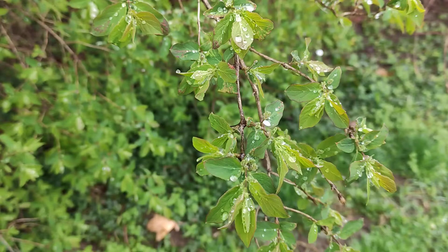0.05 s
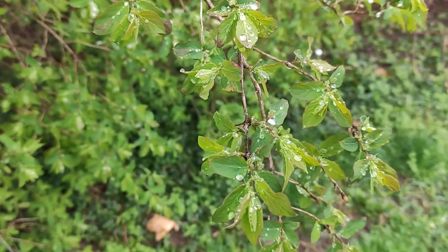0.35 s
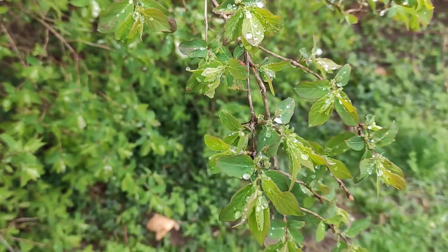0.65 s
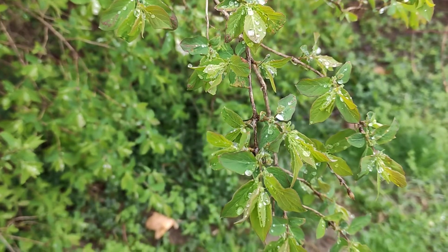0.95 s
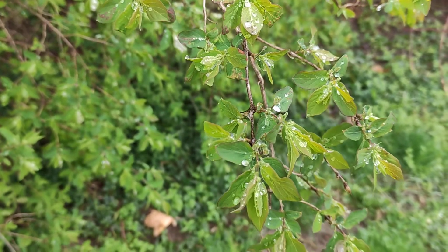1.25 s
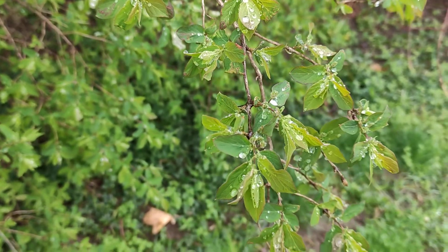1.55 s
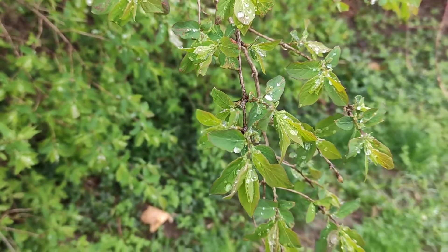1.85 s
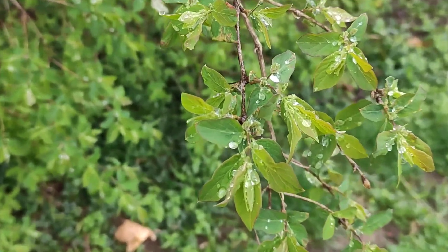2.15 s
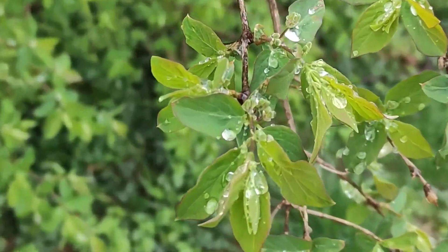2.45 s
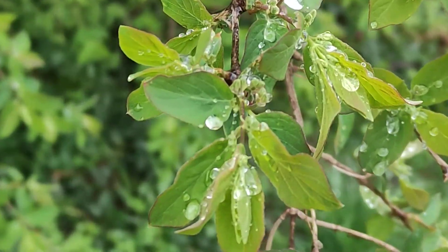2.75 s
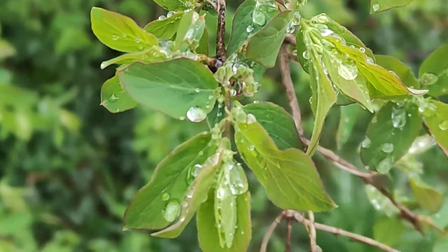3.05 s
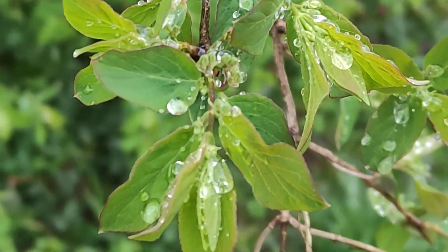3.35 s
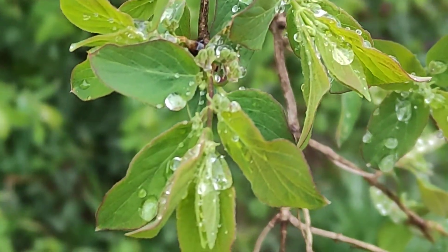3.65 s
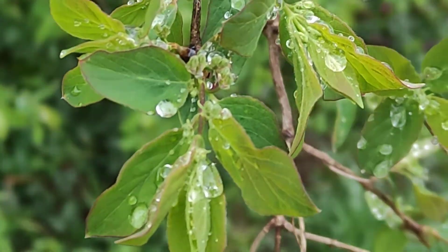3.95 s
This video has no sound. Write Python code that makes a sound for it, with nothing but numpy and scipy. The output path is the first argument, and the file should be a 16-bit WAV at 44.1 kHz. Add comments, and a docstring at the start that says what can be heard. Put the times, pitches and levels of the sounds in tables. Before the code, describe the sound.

Birds sing outdoors: first a seesawing two-note whistle, then thin high calls and soft alternating pips, before the whistle returns. Behind them are steady far traffic, a distant engine changing gear and faint ticks of water on leaves.

```python
"""Tits repeat a two-note whistle in a wet garden after rain. Another bird answers with soft pips,
a smaller one sings two thin notes and three falling slurs, a far one whistles faintly. Each note is
a tone on a pitch path, echoed by trunks, walls and trees. Behind them: far traffic and foliage
(shaped noise), one engine pulling through a gear change, drips on leaves and one soft bump."""
import sys
import numpy as np
from scipy import signal
from scipy.fft import rfft, irfft, next_fast_len
from scipy.io import wavfile
from scipy.ndimage import uniform_filter1d, map_coordinates

SR = 44100
rng = np.random.default_rng(int(sys.argv[2]) if len(sys.argv) > 2 else 0)


def generate_wav(signal):
    """Clip the signal to [-1, 1] and save it as 16-bit WAV at the path in sys.argv[1]."""
    frames = np.transpose(np.atleast_2d(signal))
    scaled = np.clip(frames, -1, 1) * 32767
    pcm = np.round(scaled).astype(np.int16)
    wavfile.write(sys.argv[1], SR, pcm)


N = 176400

# Noise spectra. Each row: frequency in Hz, level in dB.
TRAFFIC_SPECTRUM = [(25, -38), (45, -19.5), (70, -4), (105, -0.5), (160, -4), (320, -4.5), (480, -10.5),
                    (850, -16.5), (1200, -14), (1650, -13.5), (2000, -20), (3300, -28.5), (5000, -51.5)]
FOLIAGE_SPECTRUM = [(1500, -24.5), (3200, 3), (4500, -2.5), (6500, -10.5), (9000, -20), (10300, -16),
                    (15500, -25)]
RUSTLE_SPECTRUM = [(3000, -16), (5000, -6), (8200, 4.5), (10000, -8), (15000, -9)]
# Traffic balance. Each row: frequency in Hz, left minus right in dB.
TRAFFIC_PAN = [(60, -8), (200, 2), (2400, -2)]
# Noise width. Each row: frequency in Hz, left-right correlation.
COHERENCE = [(30, 0.42), (70, 0.45), (130, 0.82), (300, 0.95), (1200, 0.43), (5000, 0.028)]
# Rustle swells. Each row: centre in seconds, half width in seconds, level in dB.
RUSTLES = [(.38, 0.17, -66), (3.54, 0.038, -67.5)]
# Near drips. Each row: start in seconds, pitch in Hz, level in dB.
DRIPS = [(.394, 12000, -61), (.677, 8400, -59), (.703, 12000, -58.5), (1.262, 11500, -61),
         (2.456, 11000, -62), (3.739, 13000, -61), (3.84, 13020, -61)]
# Engine run. Each row: time in seconds, firing rate in Hz, level in dB.
ENGINE_RUN = [(1.1, 108.8, -65), (1.33, 117.2, -52), (1.46, 126.5, -42), (1.55, 128.2, -53.5),
              (1.68, 140.9, -46.5), (1.83, 142, -56.5), (1.97, 135.5, -41), (2.07, 127.3, -50.5),
              (2.2, 112, -50), (2.32, 105, -43), (2.41, 116.9, -50.5), (2.98, 128.6, -44.5),
              (3.26, 135.7, -36.5), (3.38, 139.2, -39), (3.5, 141.5, -46.5), (4, 148, -52)]
# Exhaust partials. Each row: multiple of the firing rate, level in dB.
ENGINE_ORDERS = [(.5, -24), (1, 0), (1.5, -11)]
# Tree scatter. Each row: frequency in Hz, 60 dB decay time in seconds.
GARDEN_T60 = [(4000, 1.13), (5200, 0.85), (8500, 0.86)]
# Far bird. Each row: start in seconds, level in dB.
FAR_NOTES = [(1.209, -78), (1.342, -80), (2.338, -83), (2.479, -80)]
# Small bird. Each row: start and length in seconds, top and end in Hz, fall exponent, level in dB.
THIN_NOTES = [(1.468, 0.15, 8330, 7420, 1.8, -59), (1.682, .16, 8085, 7460, 4.4, -59)]
SLURS = [(1.918, 0.083, 6750, 5440, 0.98, -57.5), (2.047, 0.069, 6850, 5300, 1, -50.5),
         (2.146, 0.082, 6270, 4670, 0.34, -53)]
# Answering bird. Each row: start in seconds, pitch in Hz, level in dB.
PIPS = [(2.415, 4070, -70.5), (2.572, 4970, -61), (2.803, 4124, -65.5), (2.96, 4945, -64),
        (3.195, 4110, -61.5), (3.362, 4914, -65), (3.384, 4197, -67), (3.582, 4130, -61),
        (3.745, 4937, -67.5), (3.86, 4156, -65)]
# Pip duration. Each row: pitch in Hz, length in seconds.
PIP_LENGTHS = [(4150, 0.074), (4970, 0.052)]
# Tit's arched notes. Each row: start in seconds, top pitch in Hz, level in dB.
LOW_NOTES = [(0.109, 3930, -58), (0.573, 3965, -52), (1.05, 3935, -53.5), (1.564, 3940, -51.5),
             (3.16, 3945, -68), (3.565, 3950, -57), (3.66, 3867, -59.5)]
# Tit's held notes. Each row: start in seconds, settled pitch in Hz, level in dB.
HIGH_NOTES = [(.306, 4424, -58.5), (0.785, 4440, -56), (1.263, 4390, -57), (1.778, 4383, -56),
              (3.777, 4410, -61)]

SIDES = np.array([[.5], [-.5]])  # left and right share of a pan in dB


def amp(db):
    return 10 ** (np.asarray(db) / 20)


def unit_rms(x):
    return x / np.sqrt(np.mean(x ** 2) + 1e-20)


def clock(length_s):
    return np.arange(int(length_s * SR)) / SR


def at_hz(points, hz):
    """Interpolate (Hz, value) rows on a log axis."""
    knots_hz, values = np.transpose(points)
    return np.interp(np.log(hz + 1), np.log(knots_hz + 1), values)


def wobble(knots_per_s, size=N):
    """Smooth random curve."""
    return map_coordinates(rng.standard_normal(4096), [np.arange(size) * knots_per_s / SR], mode="wrap")


def filtered(x, response):
    """Apply response(hz) by FFT."""
    size = next_fast_len(N + SR // 2)
    return irfft(rfft(x, size) * response(np.fft.rfftfreq(size, 1 / SR)), size)[..., :N]


def add(track, start_s, sound):
    part = track[..., max(0, round(start_s * SR)):][..., :sound.shape[-1]]
    part += sound[..., :part.shape[-1]]


def rush(spectrum, patchy_db, lead_s=.00039):
    """Stereo noise, rms 1, with patches of random gain; arrives from the left."""
    def mid_side_gains(hz):
        angle = np.arccos(np.clip(at_hz(COHERENCE, hz), -1, 1)) / 2
        return amp(at_hz(spectrum, hz)) * [np.cos(angle), np.sin(angle)]

    bins = signal.stft(rng.standard_normal((2, N)), nperseg=512)[2]
    patches = uniform_filter1d(rng.standard_normal(bins.shape[1:]), size=6, axis=0)
    patches = unit_rms(uniform_filter1d(patches, size=14, axis=1))
    noise = signal.istft(bins * amp(patchy_db * patches), nperseg=512)[1][:, :N]
    mid, side = filtered(noise, mid_side_gains)
    stereo = np.array([mid + side, mid - side])
    return unit_rms(filtered(stereo, lambda hz: np.exp(1j * np.pi * lead_s * np.outer([1, -1], hz))))


def traffic(level_db=-45):
    """Far, unsteady rumble, its deepest part to the right."""
    rumble = rush(TRAFFIC_SPECTRUM, patchy_db=0)
    panned = filtered(rumble, lambda hz: amp(SIDES * at_hz(TRAFFIC_PAN, hz)))
    return amp(level_db + 1.6 * wobble(5.8)) * panned


def foliage(hiss_db=-63.5):
    """Hiss of wet leaves with brief soft rustles."""
    t = np.arange(N) / SR
    swell = sum(amp(db) * np.exp(-.5 * ((t - centre_s) / width_s) ** 2)
                for centre_s, width_s, db in RUSTLES)
    hiss = amp(hiss_db) * rush(FOLIAGE_SPECTRUM, patchy_db=2.5)
    return hiss + swell * rush(RUSTLE_SPECTRUM, patchy_db=5)


def bump(start_s=.425, hz=193, level_db=-36, t60_s=.028):
    """One soft, low bump close by: a damped sine."""
    out, t = np.zeros(N), clock(t60_s)
    add(out, start_s, amp(level_db - 60 * t / t60_s) * np.sin(2 * np.pi * hz * t))
    return out


def drips(t60_s=.017, pan_db=-7, patter_per_s=10, patter_db=-72):
    """Drops tick on leaves to the right: a few near ones over a faint random patter."""
    out, t = np.zeros((2, N)), clock(t60_s)
    patter = [(when * N / SR, 10000 + 4000 * pitch, patter_db + 6 * force)
              for when, force, pitch in rng.random((int(patter_per_s * N / SR), 3))]
    for start_s, hz, db in DRIPS + patter:
        leaf = signal.butter(2, [hz / 1.2, hz * 1.2], "band", fs=SR, output="sos")
        noise = unit_rms(signal.sosfilt(leaf, rng.standard_normal((2, len(t)))))
        add(out, start_s, amp(db + pan_db * SIDES - 60 * t / t60_s) * noise)
    return out


def engine():
    """Distant exhaust drone: climbs, drops at the gear change, climbs again."""
    times_s, *columns = np.transpose(ENGINE_RUN)
    firing_hz, level_db = [np.interp(np.arange(N) / SR, times_s, column) for column in columns]
    phase = 2 * np.pi * np.cumsum(firing_hz + wobble(10)) / SR
    drone = sum(amp(db + 1.8 * wobble(17)) * np.sin(order * phase + .25 * wobble(21))
                for order, db in ENGINE_ORDERS)
    return np.sqrt(2) * amp(level_db) * drone


def garden(x, pan_db, wet_db, echo_s, echo_db, wet_pan_db, direct_db=-1.5, wall_t60_s=.0071):
    """Direct sound, quick copies off trunks, a smeared wall echo and the long scatter of the trees."""
    hz, t, bins = signal.stft(rng.standard_normal((2, SR)), SR, nperseg=256)
    decay = amp(-60 * t / at_hz(GARDEN_T60, hz)[:, None])
    scatter = signal.istft(bins * decay, SR, nperseg=256)[1]
    impulse = amp(wet_db) * scatter / np.linalg.norm(scatter[0])
    wall = rng.standard_normal((2, 1024)) * amp(-60 * np.arange(1024) / SR / wall_t60_s)
    add(impulse, echo_s, amp(echo_db) * wall / np.linalg.norm(wall[0]))
    for channel in impulse:
        for trunk_s in rng.uniform(.004, .045, size=6):
            add(channel, trunk_s, amp([wet_db - 12]))
    wet = signal.fftconvolve(x[None], impulse, axes=1)[:, :N]
    return amp(pan_db * SIDES + direct_db) * x + amp(wet_pan_db * SIDES) * wet


def whistle(hz, attack_s, release_s, waver_hz, flutter_db):
    """Pure tone on a pitch path, slightly unsteady."""
    t = np.arange(len(hz)) / SR
    rise = np.sin(np.pi / 2 * np.clip(t / attack_s, 0, 1))
    fall = np.sin(np.pi / 2 * np.clip((t[-1] - t) / release_s, 0, 1))
    phase = 2 * np.pi * np.cumsum(hz + waver_hz * wobble(215, len(t))) / SR
    return np.sqrt(2) * rise * fall * amp(flutter_db * wobble(54, len(t))) * np.sin(phase)


def far_bird(centre_hz=8190, fall_hz_per_s=1200, length_s=.098):
    """Thin whistles that arrive mostly as echo."""
    out, t = np.zeros(N), clock(length_s)
    hz = centre_hz - fall_hz_per_s * (t - t.mean())
    for start_s, db in FAR_NOTES:
        add(out, start_s, amp(db) * whistle(hz, .018, .017, waver_hz=102, flutter_db=1.6))
    return garden(out, pan_db=7, wet_db=2.5, echo_s=.05, echo_db=-4, wet_pan_db=8)


def small_bird(flick_s=.0169, flick_hz=885):
    """Two thin notes droop; three slurs flick up and fall, gaining a faint octave as they get low."""
    thin, slurs = np.zeros(N), np.zeros(N)
    for start_s, length_s, top_hz, end_hz, bend, db in THIN_NOTES:
        hz = top_hz + (end_hz - top_hz) * (clock(length_s) / length_s) ** bend
        add(thin, start_s, amp(db) * whistle(hz, .025, .04, waver_hz=32, flutter_db=2.5))
    for start_s, length_s, top_hz, end_hz, bend, db in SLURS:
        t = clock(length_s)
        fall = np.clip((t - flick_s) / (length_s - flick_s), 0, 1) ** bend
        hz = top_hz + (end_hz - top_hz) * fall - flick_hz * np.clip(1 - t / flick_s, 0, 1)
        tone = whistle(hz, .03, .015, waver_hz=70, flutter_db=3)
        octave = whistle(2 * hz, .045, .012, waver_hz=150, flutter_db=2.2)
        octave_db = -28 - 9 * (hz - 5000) / 1000
        add(slurs, start_s, amp(db) * (tone + amp(octave_db) * octave))
    return (garden(thin, pan_db=11, wet_db=-5, echo_s=.036, echo_db=-10, wet_pan_db=8)
            + garden(slurs, pan_db=1.5, wet_db=-4.5, echo_s=.031, echo_db=-13, wet_pan_db=1))


def answering_bird(fall_hz_per_s=500):
    """Nearly level pips, low and high in turn; the high ones are shorter."""
    out = np.zeros(N)
    for start_s, centre_hz, db in PIPS:
        t = clock(at_hz(PIP_LENGTHS, centre_hz))
        hz = centre_hz - fall_hz_per_s * (t - t.mean())
        add(out, start_s, amp(db) * whistle(hz, .0097, .03, waver_hz=16, flutter_db=.33))
    return garden(out, pan_db=7, wet_db=-3, echo_s=.03, echo_db=-12, wet_pan_db=0)


def two_note_bird(note_s=.15, arch_top_s=.085):
    """A low note swells over a pitch arch; a higher one starts sharply, holds and rings in the trees."""
    low, high, t = np.zeros(N), np.zeros(N), clock(note_s)
    arch_hz = -480 * np.abs(t / arch_top_s - 1) ** 2.3
    chip_hz = 1100 * np.exp(-t / .003) - 260 * np.exp(-t / .009)  # flicks down, undershoots, settles
    for start_s, hz, db in LOW_NOTES:
        add(low, start_s, amp(db) * whistle(hz + arch_hz, .07, .085, waver_hz=30, flutter_db=2.4))
    for start_s, hz, db in HIGH_NOTES:
        add(high, start_s, amp(db) * whistle(hz + chip_hz, .009, .13, waver_hz=27, flutter_db=2))
    return (garden(low, pan_db=-2, wet_db=-.5, echo_s=.085, echo_db=-7, wet_pan_db=-2)
            + garden(high, pan_db=1, wet_db=1, echo_s=.15, echo_db=-9, wet_pan_db=-2))


def scene():
    birds = two_note_bird() + answering_bird() + small_bird() + far_bird()
    return birds + engine() + drips() + bump() + traffic() + foliage()


def record(dry):
    """Fade-in, then a hard band limit."""
    start_s, fade_s, top_hz = .11, .27, 15700
    fade = np.clip((np.arange(N) / SR - start_s) / fade_s, 0, 1) ** .62
    return filtered(dry * fade, lambda hz: hz < top_hz)


dry = scene()
out = record(dry)
generate_wav(out)
```